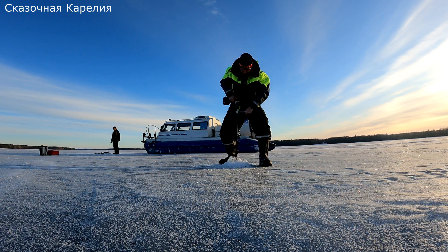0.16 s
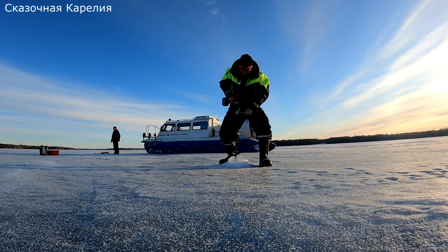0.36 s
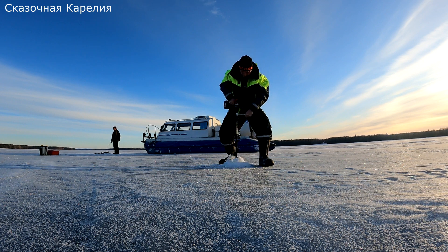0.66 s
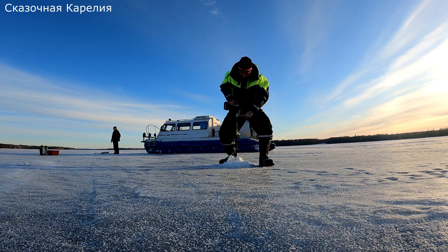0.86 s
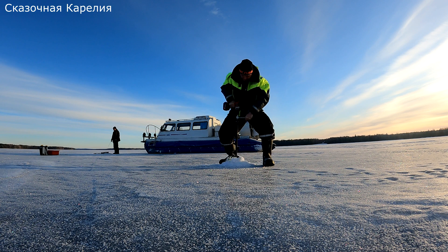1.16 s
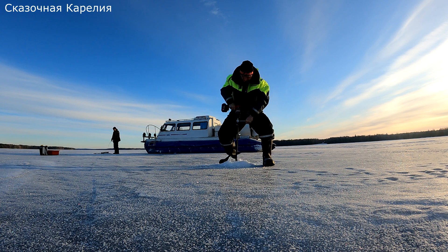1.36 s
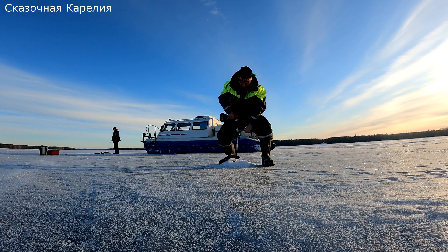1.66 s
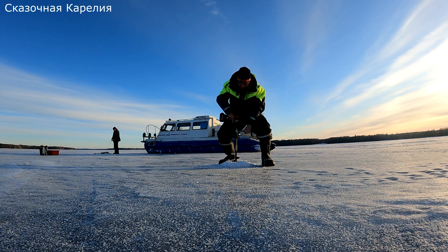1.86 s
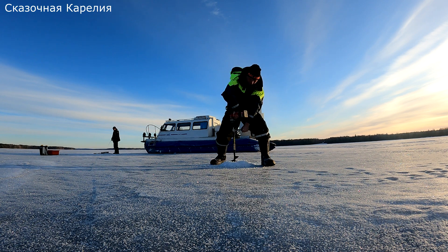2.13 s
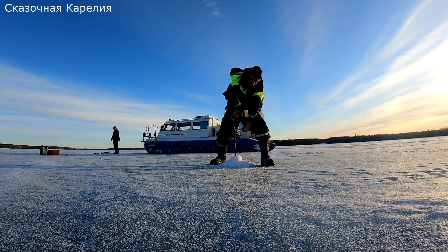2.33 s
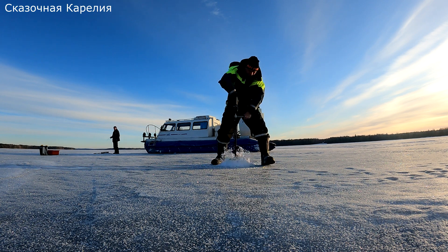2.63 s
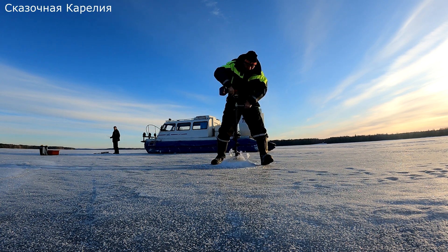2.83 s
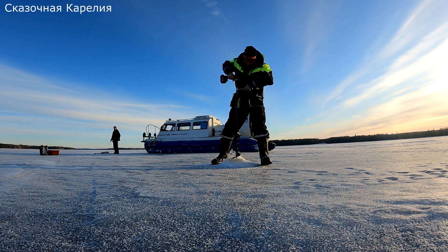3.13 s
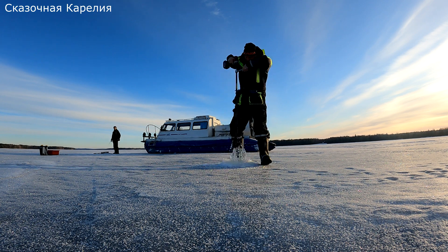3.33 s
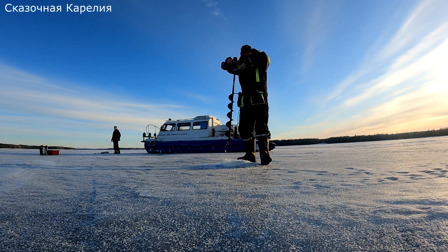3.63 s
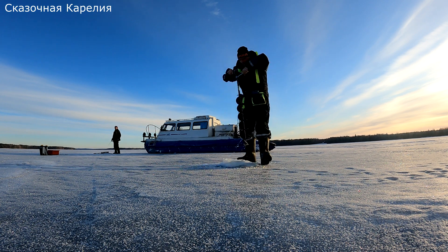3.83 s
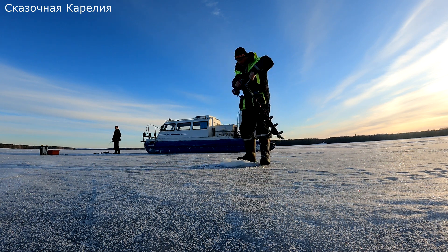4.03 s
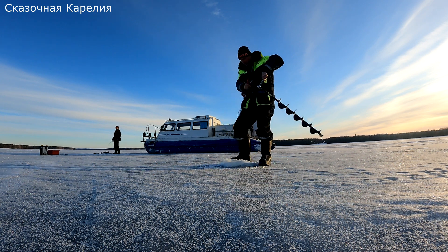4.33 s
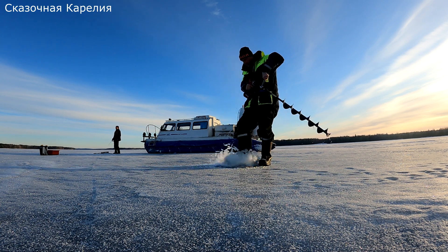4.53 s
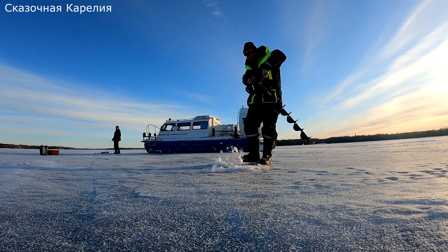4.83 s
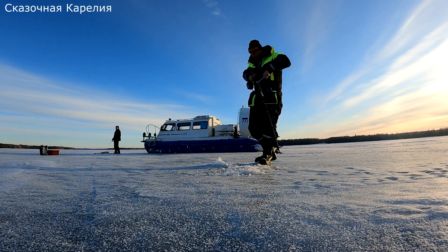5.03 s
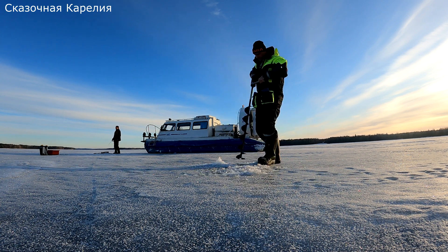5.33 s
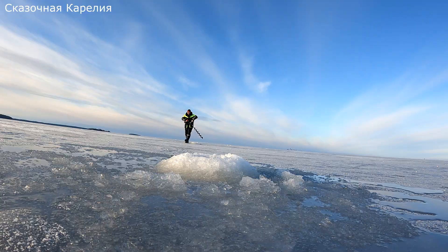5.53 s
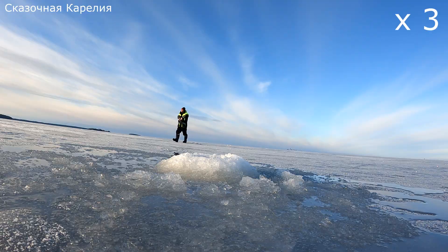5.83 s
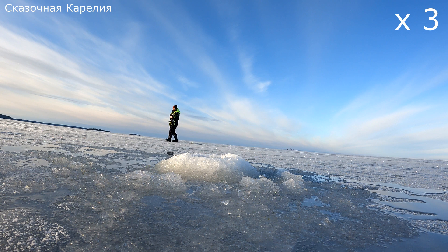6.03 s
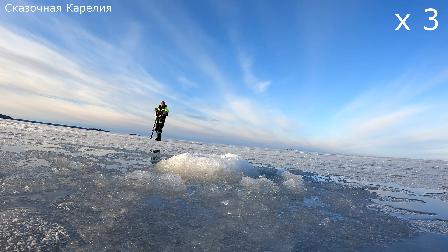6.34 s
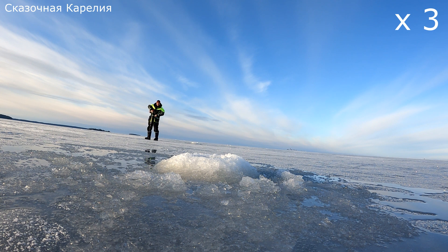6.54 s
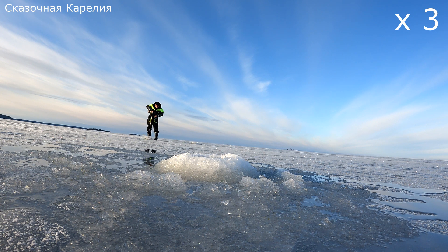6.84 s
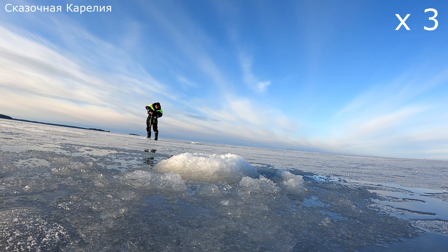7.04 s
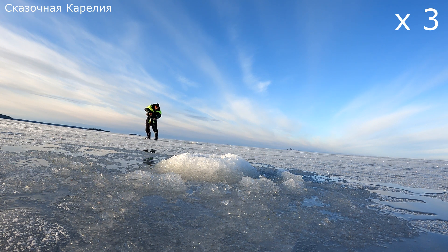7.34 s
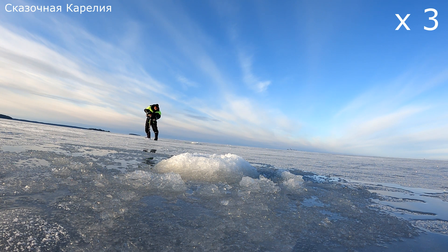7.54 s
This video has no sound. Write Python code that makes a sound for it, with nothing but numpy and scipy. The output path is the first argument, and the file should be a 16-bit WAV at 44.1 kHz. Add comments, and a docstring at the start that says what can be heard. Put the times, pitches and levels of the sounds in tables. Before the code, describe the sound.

A cordless drill bores an auger through lake ice, stops, churns up slush and splashing water, then boots crunch and a brighter, raspier hole begins.

```python
"""A cordless drill turns an auger in lake ice: gear tones whine and grains of noise make chips and slush.
The blades bind and break through, then the auger churns slush and rattles up out of the hole.
Washes of noise spill water and sweep slush aside, rising tones make splats, and a boat engine idles behind.
Then, from another spot without the engine, boots crunch in clumps of tiny impacts and
the drill starts a new hole, with a bright rasp on dry crust and a singing shaft."""
import sys
import numpy as np
from scipy import signal
from scipy.fft import rfft, irfft, next_fast_len
from scipy.io import wavfile
from scipy.ndimage import uniform_filter1d, map_coordinates

SR = 44100
rng = np.random.default_rng(int(sys.argv[2]) if len(sys.argv) > 2 else 0)


def generate_wav(signal):
    """Clip the signal to [-1, 1] and save it as 16-bit WAV at the path in sys.argv[1]."""
    frames = np.transpose(np.atleast_2d(signal))
    scaled = np.clip(frames, -1, 1) * 32767
    pcm = np.round(scaled).astype(np.int16)
    wavfile.write(sys.argv[1], SR, pcm)


N = 339129
TIME = np.arange(N) / SR   # seconds

# Levels in dB are relative settings; each source balances its own layers further on.
# Gear speed while boring, before the swing of each turn: (time [s], tooth-mesh rate [Hz])
BORING_SPEED = [(1.41, 988), (1.442, 715), (1.465, 930), (1.497, 1052), (1.535, 1025), (1.572, 980),
                (1.6, 1062), (1.68, 1070), (1.722, 932), (1.797, 1008), (1.825, 760)]
# Gear speed while clearing the hole: (time [s], tooth-mesh rate [Hz])
CLEARING_SPEED = [(2.22, 480), (2.26, 615), (2.32, 752), (2.375, 825), (2.41, 950), (2.445, 1025),
                  (2.485, 988), (2.52, 1085), (2.547, 925), (2.578, 1020), (2.62, 900)]
# Gear speed at the new hole: (time [s], tooth-mesh rate [Hz])
NEW_HOLE_SPEED = [(6.755, 375), (6.785, 760), (6.8, 1025), (6.815, 1142), (6.86, 1075), (7.2, 1027),
                  (7.69, 1011)]
# Gear tones while boring: (multiple of the mesh rate, level [dB])
BORING_TONES = [(1, -9), (2, -16), (3, -21), (4, -6), (5, -20), (6, -13.5)]
# Gear tones from the moment the blades catch: (multiple of the mesh rate, level [dB])
FREE_TONES = [(1, -4.5), (2, -9), (3, -6.5), (4, -6.5), (5, -11.5), (6, -6)]
# Gear tones under the strain of lifting: (multiple of the mesh rate, level [dB])
LIFTING_TONES = [(1, -6), (1.42, -4), (3, -5.5), (4, -5.5), (4.55, -9.5), (5, -10), (6, -12), (6.62, -8.5)]
# Gear tones at the new hole: (multiple of the mesh rate, level [dB])
NEW_HOLE_TONES = [(3, -3.5), (3.47, -17), (6, -8), (6.55, -12), (12, -9), (15, -8)]
# Strength of the gear whine while boring: (time [s], level [dB])
BORING_WHINE = [(0, -34), (.95, -29.5), (1.4, -34), (1.455, -24.5), (1.49, -31.5), (1.74, -29.5),
                (1.797, -25), (1.812, -40)]
# Load on the blades, which lets go as they break through: (time [s], level [dB])
BLADE_LOAD = [(0, 0), (1.37, -0.5), (1.47, -7), (1.56, -9.5), (1.665, -0.5), (1.755, -11), (1.81, -10)]
# Effort of the drill as it lifts the flooded auger: (time [s], level [dB])
LIFT_EFFORT = [(2.19, -29), (2.29, 0.5), (2.56, -1.5), (2.65, -12.5), (3.08, -10.5), (3.255, -6.5),
               (3.295, -23)]
# Buzzing bursts of the casing: two crunches while boring, then blades catching, motor braking
# and speed gathering: (time [s], length [s], level [dB])
CASING_STRAINS = [(1.228, .035, -30.5), (1.308, .03, -32), (1.422, .02, -29), (1.798, 0.018, -29),
                  (2.215, 0.38, -32.5)]
# The auger bangs and drags on the wall: (time [s], level [dB], length of contact [s])
WALL_KNOCKS = [(1.43, -12.5, 0.0085), (1.494, -16.5, 0.0046), (1.648, -18.5, 0.011), (2.403, -16.5, .008),
               (2.418, -13, 0.0086), (2.467, -14.5, 0.0077), (2.514, -9.5, 0.0094), (2.547, -12.5, 0.0075),
               (2.715, -14, 0.0052), (2.739, -15.5, 0.016), (2.82, -13.5, 0.0054), (2.85, -16.5, .014),
               (2.892, -15.5, 0.017), (2.918, -11.5, 0.01), (2.957, -13.5, 0.027), (2.991, -10.5, 0.0099),
               (3.014, -11.5, 0.0078), (3.044, -9.5, 0.022), (3.075, -8.5, 0.022), (3.124, -9, .007),
               (3.143, -13.5, .008), (3.165, -8.5, 0.02), (3.21, -7.5, 0.0086), (3.231, -11.5, .008),
               (3.253, -7.5, 0.0083)]
# Washes over the ice: (time [s], length [s], spill level [dB], spray level [dB], fall [dB/s])
WATER_WASHES = [(1.815, 0.06, -47, -50.5, 53), (3.24, 0.063, -35, -42, 22.5), (3.477, .27, -46, -39.5, 147),
                (3.978, .21, -53, -47, 58), (4.12, 0.1, -45.5, -43, 60), (4.24, 0.12, -35.5, -40, 63),
                (4.409, 0.088, -28, -32.5, 34), (4.755, .21, -36, -24.7, 57), (5.21, 0.075, -32, -44, 279)]
# Heavy lumps of slush: (time [s], level [dB])
SLUSH_THUMPS = [(1.41, -14), (1.577, -15), (1.705, -15.5), (2.376, -13), (2.438, -10), (2.533, -9.5),
                (4.581, -14)]
# Splats and drops: (time [s], level [dB], starting bubble pitch [Hz], extra slap level [dB])
WET_SPLATS = [(1.876, -29, 1890, -3.5), (2.065, -36, 3000, -5), (2.197, -31, 2870, -4),
              (2.22, -23, 2750, -15), (3.42, -24, 1164, -18), (3.782, -19.5, 2300, -19),
              (4.221, -25.5, 2560, -7), (4.304, -23.5, 2040, -5), (4.371, -19.5, 1330, 0),
              (4.412, -27, 1410, 1), (4.477, -14.5, 1930, -2.5), (4.585, -11, 1210, -3.5),
              (4.698, -26, 1340, 1), (5.283, -23, 1460, 0.5), (5.439, -25, 3250, -1.5)]
# Boots, and last the auger's tip, pressing the crust: (time [s], length [s], level [dB])
CRUST_STEPS = [(5.701, 0.14, -51.5), (5.891, 0.083, -43), (6.055, 0.086, -46), (6.272, 0.063, -46),
               (6.364, 0.015, -47.5), (6.404, .1, -46.5), (6.544, 0.028, -42.5), (6.633, 0.026, -48),
               (6.749, .03, -39)]
# Crust snapping underfoot: (time [s], level [dB])
CRUST_SNAPS = [(5.724, -32), (5.899, -25), (5.927, -23), (5.96, -23.5), (6.058, -29), (6.294, -21),
               (6.38, -30), (6.475, -21.5), (6.4925, -11.5), (6.498, -21), (6.613, -22.5), (6.647, -24.5)]
# Dull bumps on the ice: (time [s], level [dB], pitch [Hz])
ICE_BUMPS = [(5.926, -39, 440), (6.058, -35, 620), (6.186, -41, 485), (6.291, -42, 208.8),
             (6.486, -44, 424), (6.612, -41, 480)]
# Idling boat engine: (multiple of the firing rate, level [dB])
IDLE_TONES = [(1, -41), (2, -47), (3, -60)]
# Ringing of the gear housing: (pitch [Hz], width [Hz], lift [dB])
HOUSING_RING = [(2960, 1200, 7), (5860, 1060, 3.5), (6670, 57, 4), (9400, 330, 3.5)]
# Ringing of the auger: (pitch [Hz], width [Hz], lift [dB])
AUGER_RING = [(488, 69, 8), (990, 95, 9), (1303, 144, 9.5), (1830, 58, 11.2), (2147, 230, 9.8)]
# Ringing of the shaft when knocked: (pitch [Hz], width [Hz], lift [dB])
KNOCKED_SHAFT_RING = [(473.5, 71, 17), (1032, 60, 4.1), (2200, 210, 6.7)]
# Ringing of the blades on dry crust: (pitch [Hz], width [Hz], lift [dB])
RASPING_BLADE_RING = [(5380, 170, 3.8), (6220, 290, 8.5), (6700, 90, 5.2), (7050, 250, 3.1)]
# Ringing of the bare shaft at the new hole: (pitch [Hz], width [Hz], lift [dB])
BARE_SHAFT_RING = [(529.6, 130, 10), (1663, 41, 6.3)]
# Colour of the gear clatter: (frequency [Hz], level [dB per Hz])
GEARBOX_COLOUR = [(700, -8.5), (1500, -3.5), (2600, -3.5), (4000, -1), (5000, -2), (7000, -3.5), (8000, -3),
                  (9800, -6), (11000, -14.5), (14000, -26.5), (15500, -55)]
# Colour of the blades chipping ice: (frequency [Hz], level [dB per Hz])
CHIP_COLOUR = [(150, -40.5), (400, 7), (720, -20), (1150, 4), (2000, -1.5), (2600, -11), (4000, -29.5),
               (9000, -35)]
# Colour of churning slush: (frequency [Hz], level [dB per Hz])
CHURN_COLOUR = [(35, -31.5), (70, -7.5), (130, 1), (360, -1), (560, -3.5), (850, -14), (1500, -15.5),
                (5000, -66)]
# Colour of knocks on the wall: (frequency [Hz], level [dB per Hz])
KNOCK_COLOUR = [(100, -12), (350, -23.5), (600, -2.5), (1500, -2.5), (2400, -7.5), (3500, -12.5),
                (7000, -16.5), (10000, -24.5), (15000, -45)]
# Colour of spilling water: (frequency [Hz], level [dB per Hz])
SPILL_COLOUR = [(100, -10), (300, -1.5), (700, -5), (1400, -0.5), (2200, -3), (4000, -11), (12000, -40)]
# Colour of pattering spray: (frequency [Hz], level [dB per Hz])
SPRAY_COLOUR = [(600, -24), (1500, -1), (2800, 4), (5000, 2), (7500, 0), (8600, -7.5), (11000, -12.5),
                (14000, -25), (15500, -64)]
# Colour of crunching steps: (frequency [Hz], level [dB per Hz])
CRUNCH_COLOUR = [(88, -56), (150, -12), (190, -15.5), (361, -12), (612, -6.5), (1140, -7.5), (2020, -13.5),
                 (2700, -12.5), (3770, -4.5), (11700, -7), (16000, -3.5)]
# Colour of the rasp on dry crust: (frequency [Hz], level [dB per Hz])
RASP_COLOUR = [(1500, -36.5), (2700, -11), (3200, 1), (4500, -2), (5800, 1), (9500, -2.5), (11000, -4.5),
               (13000, -3.5), (15600, -6)]
# Colour of the humming bare shaft: (frequency [Hz], level [dB per Hz])
SHAFT_COLOUR = [(50, -28), (130, -14), (220, -7), (500, -1.5), (800, 2), (1300, 6.5), (2500, 4.5),
                (4000, -23)]
# Colour of the low grinding on solid ice: (frequency [Hz], level [dB per Hz])
GRIND_COLOUR = [(90, -30), (160, -2), (250, 3.5), (420, -13), (2000, -36)]
# Colour of the exhaust rumble: (frequency [Hz], level [dB per Hz])
RUMBLE_COLOUR = [(30, -19), (60, 6), (120, 4), (220, -4), (320, -12), (450, -12.5), (1000, -34),
                 (9000, -49)]
# Colour of the quiet air: (frequency [Hz], level [dB per Hz])
AIR_COLOUR = [(30, -32), (157, -8.5), (336, -13), (632, 4.5), (2540, -25.5), (3670, -12), (10800, -24),
              (16000, -14)]

MOVE_S = 5.548   # the listening spot changes
PORT_LAG, PORT_LAG_NEW = .68, .27   # how much later the left side hears, in samples
# boring: the trigger is released at the stop
BORE_STOP_S, STOP_DB_PER_S = 1.821, 1002
JAM_S = 1.425   # the blades catch at the underside of the ice
GEARBOX_DB, BLADES_DB, CHURN_DB = -24.5, -25, -27.5   # at the opening load
GEARBOX_FOLLOWS, BLADES_FOLLOW, CHURN_FOLLOWS = 0.68, 1.76, 0.87   # dB per dB of load
TURNS_PER_S, SWING, FASTEST_S, SWING_DB = 4.93, .021, .147, 3.5   # SWING is a fraction of the speed
# clearing: the flights catch, scrape the wall and pump up a surge of slush
LIFT_GEARBOX_DB, LIFT_WHINE_DB = -30, -29.5
ENGAGE_S, SCRAPE_S, SCRAPE_DB, SCRAPE_FOLLOWS = 2.36, 1, -29.5, 0.37
SURGE_S, SURGE_DB, SURGE_FOLLOWS = 0.23, -23, 0.43
CASING_HZ = 2980   # where the casing rings
# the new hole: the blades sink in, then the rasp eases off
NEW_START_S, SINK_S, RASP_HOLD_S, RASP_EASES_DB_PER_S = 6.742, 0.18, 0.37, 5
RASP_DB, SHAFT_DB, NEW_WHINE_DB = -22.5, -40, -32
SWEEP_S, SWEEP_DB = 6.765, -31   # the highest gear tones sweep up first
CHIRP_S, CHIRP_DB = 6.789, -32   # the gears sing out just before they reach full speed
SONG_S, SONG_DB, SHAFT_HZ = 7.26, -41, 2440   # the bare shaft starts to sing
DIG_S, DIG_DB = 7.0, -52.5   # the blades reach solid ice and add a low grinding
# water, boots and boat
WASH_ATTACK_S, TRICKLE_DB = 0.058, -59
STEP_ATTACK_S, STEP_FALL_DB_PER_S = .004, 700
SCUFF_DB, SCUFF_END_S = -58.5, 6.34   # soles drag lightly between the steps
IDLE_HZ = 98.4   # firing rate
CUTOFF_HZ = 15900


def deep_hole():
    """Gears whine and clatter in their housing, blades chip the ice in surges, the flights churn slush."""
    singing, gearbox, blades, churn = boring() + clearing()
    clatter = body(grains(9000, 3.24) * from_db(1.0 * drift(60)), GEARBOX_COLOUR, HOUSING_RING)
    # the blades bite about fourteen times a second
    turn = 2 * np.pi * np.cumsum(14.0 * (1 + 0.15 * drift(5.8))) / SR
    bite = from_db(2.0 * np.sin(turn) + 1.23 * drift(55))
    chip_grains = shifting(blades * bite * grains(3500, 0.91), depth=0.47)
    chips = wander(body(chip_grains, CHIP_COLOUR, AUGER_RING), stray_s=.0012)
    slush = from_db(-3) * body(churn * from_db(2.0 * drift(35)) * grains(1500, 1.5), CHURN_COLOUR)
    return casing(singing * gears()) + gearbox * shifting(clatter, depth=0.66) + chips + slush


def boring():
    """Gains of whine, gearbox, blades and slush: all but the whine follow the load on the blades."""
    load_db = np.interp(TIME, *np.transpose(BLADE_LOAD))
    running = from_db(-STOP_DB_PER_S * np.clip(TIME - BORE_STOP_S, 0, .5))
    whine_db = np.interp(TIME, *np.transpose(BORING_WHINE))
    gearbox_db = GEARBOX_DB + GEARBOX_FOLLOWS * load_db
    blades_db = BLADES_DB + BLADES_FOLLOW * load_db
    churn_db = CHURN_DB + CHURN_FOLLOWS * load_db
    return running * from_db([whine_db, gearbox_db, blades_db, churn_db])


def clearing():
    """The same four gains while lifting: all follow effort, blades and slush once the flights catch."""
    effort_db = np.interp(TIME, *np.transpose(LIFT_EFFORT), left=-150, right=-150)
    scrape = swell(ENGAGE_S, SCRAPE_S, attack_s=0.029, fall_db_per_s=398)
    surge = swell(ENGAGE_S, SURGE_S, attack_s=0.032, fall_db_per_s=23)
    whine = from_db(LIFT_WHINE_DB + 1.4 * effort_db)
    gearbox = from_db(LIFT_GEARBOX_DB + effort_db)
    blades = scrape * from_db(SCRAPE_DB + SCRAPE_FOLLOWS * effort_db)
    churn = surge * from_db(SURGE_DB + SURGE_FOLLOWS * effort_db)
    return np.array([whine, gearbox, blades, churn])


def gears():
    """Meshing teeth sing: clean and loudest at top speed while boring, rougher after the blades catch."""
    speed = turning(BORING_SPEED + CLEARING_SPEED)
    # an off-centre gear throws sidebands
    wobble = 1 + 0.15 * gear_tones(speed, [(1 / 3, 0)], flutter=0.0026, rough_db=-2.0)
    clean = from_db(SWING_DB * each_turn()) * gear_tones(speed, BORING_TONES, flutter=.003, rough_db=2)
    stutter = rms_one(from_db(2.5 * drift(110)))   # slack teeth touch unevenly
    free = from_db(-2.5) * stutter * gear_tones(speed, FREE_TONES, flutter=.004, rough_db=2)
    rough = from_db(-3.5) * stutter * gear_tones(speed, LIFTING_TONES, flutter=.008, rough_db=3.5)
    return wobble * np.select([TIME < JAM_S, TIME < LIFT_EFFORT[0][0]], [clean, free], rough)


def gear_tones(mesh_hz, orders, flutter, rough_db):
    """Tones at multiples of the tooth-mesh rate; the load makes speed and strength tremble."""
    phase = 2 * np.pi * np.cumsum(mesh_hz * (1 + flutter * drift(44.9))) / SR
    return sum(from_db(db) * rms_one(np.sin(k * phase) * from_db(rough_db * drift(21)))
               for k, db in orders)


def turning(speed):
    """Tooth-mesh rate, swinging a little with each turn in the deep ice."""
    return np.interp(TIME, *np.transpose(speed)) * (1 + SWING * each_turn())


def each_turn():
    """Deep in solid ice the auger runs freer (+1) and heavier (-1) once on every turn."""
    return (TIME < JAM_S) * np.cos(2 * np.pi * TURNS_PER_S * (TIME - FASTEST_S))


def casing(whine):
    """The small casing gives little bass; tones near its pitch flare up, and in short bursts it buzzes."""
    strain = np.max([from_db(db) * swell(s, length_s, attack_s=length_s / 6, fall_db_per_s=500)
                     for s, length_s, db in CASING_STRAINS], axis=0)
    whine = signal.sosfilt(signal.butter(2, 750, "high", fs=SR, output="sos"), whine)
    flare = .7 * signal.lfilter(*signal.iirpeak(CASING_HZ, 16, fs=SR), whine)
    # loose parts slap in step with the teeth
    slapping = np.sign(whine) + 2.1 * rng.standard_normal(N)
    buzz = signal.sosfilt(signal.butter(2, [2350, 4100], "band", fs=SR, output="sos"), slapping)
    return whine + flare + strain * rms_one(buzz)


def knocks():
    """The auger rubs and bangs on the wall of the hole and its shaft rings."""
    rubbing = from_db(.5) * clearing()[2]   # the blade gain
    banging = np.max([from_db(db) * swell(s, length_s, attack_s=0.0013, fall_db_per_s=950)
                      for s, db, length_s in WALL_KNOCKS], axis=0)
    scrape = shifting(np.hypot(rubbing, banging) * grains(2800, 2.3), depth=.6)
    ringing = wander(body(scrape, KNOCK_COLOUR, KNOCKED_SHAFT_RING), stray_s=.001)
    return from_db(-9.5) * ringing


def new_hole():
    """The drill whines up to speed, blades shave dry crust with a bright rasp, the bare shaft rings."""
    crust = from_db(RASP_DB) * swell(NEW_START_S, RASP_HOLD_S, SINK_S, RASP_EASES_DB_PER_S)
    rasp_grains = shifting(crust * from_db(0.69 * drift(77)) * grains(9000, 1.4), depth=0.78)
    rasp = body(rasp_grains, RASP_COLOUR, RASPING_BLADE_RING)

    shaft = from_db(SHAFT_DB) * np.clip((TIME - NEW_START_S) / 0.34, 0, 1) ** 0.69
    ringing = body(shaft * from_db(1.96 * drift(20)) * grains(3000, 1.4), SHAFT_COLOUR, BARE_SHAFT_RING)
    song = from_db(SONG_DB) * np.clip((TIME - SONG_S) / .15, 0, 1) ** .5
    ringing += song * gear_tones(SHAFT_HZ, [(1, 0)], flutter=.017, rough_db=4)

    speed = turning(NEW_HOLE_SPEED)
    whine = from_db(NEW_WHINE_DB) * swell(CHIRP_S, RASP_HOLD_S, attack_s=0.074, fall_db_per_s=6.5)
    whine += from_db(CHIRP_DB) * swell(CHIRP_S, length_s=0.016, attack_s=0.01, fall_db_per_s=1200)
    tremble = rms_one(from_db(1.5 * drift(150)))
    tones = whine * gear_tones(speed, NEW_HOLE_TONES, flutter=.006, rough_db=2.4) * tremble
    sweep = from_db(SWEEP_DB) * swell(SWEEP_S, .012, attack_s=.003, fall_db_per_s=800)
    tones += sweep * gear_tones(speed, NEW_HOLE_TONES[-2:], flutter=.006, rough_db=2)

    digging = from_db(DIG_DB) * np.clip((TIME - DIG_S) / 0.21, 0, 1)
    grind = body(digging * grains(1500, 2.1), GRIND_COLOUR)
    return rasp + ringing + grind + tones


def water():
    """Slush spills over the ice, droplets patter down and heavy lumps thump, all made of tiny impacts."""
    spill, spray = washes()
    spilling = body(spill * from_db(1.1 * drift(42)) * grains(1100, 2.65), SPILL_COLOUR)
    spraying = body(spray * from_db(1.3 * drift(46)) * grains(5000, 2.7), SPRAY_COLOUR)
    lumps = from_db(-8.5) * body(bursts(SLUSH_THUMPS, 0.00099, 0.0094) * grains(5000, 6.0), CHURN_COLOUR)
    spilling = from_db(-2.5) * shifting(spilling, depth=0.93)
    spraying = from_db(-1.5) * shifting(spraying, depth=0.38)
    return spilling + spraying + lumps


def washes():
    """Gains of spill and spray: each wash swells and drains away, over a trickle after the boring stops."""
    spill = spray = from_db(TRICKLE_DB) * (TIME > BORE_STOP_S)
    for s, length_s, spill_db, spray_db, fall in WATER_WASHES:
        flow = swell(s, length_s, WASH_ATTACK_S, fall)
        spill = np.hypot(spill, from_db(spill_db) * flow)
        spray = np.hypot(spray, from_db(spray_db) * flow)
    return spill, spray


def splats():
    """Each wet lump lands with a sharp slap and traps a bubble whose pitch rises."""
    out, age = np.zeros(N), TIME[:SR // 20]
    for s, db, hz, _ in WET_SPLATS:
        at = int(s * SR)
        bubble = np.sin(2 * np.pi * hz * age * (1 + 22 * age)) * np.exp(-age / .0028)
        out[at:at + len(age)] += from_db(db - 3.5) * bubble
    slap_rows = [(s, db + slap_db) for s, db, _, slap_db in WET_SPLATS]
    slap = bursts(slap_rows, .0001, .001) * rng.standard_normal(N)
    return out + from_db(-2.0) * body(slap, SPRAY_COLOUR) + from_db(-0.5) * body(slap, SPILL_COLOUR)


def steps():
    """Boots scuff and crush the frozen crust in clumps of sharp grains, with a few louder snaps."""
    scuff = [(CRUST_STEPS[0][0], SCUFF_END_S - CRUST_STEPS[0][0], SCUFF_DB)]
    tread = np.max([from_db(db) * swell(s, length_s, STEP_ATTACK_S, STEP_FALL_DB_PER_S)
                    for s, length_s, db in CRUST_STEPS + scuff], axis=0)
    crush = tread * rms_one(from_db(2.3 * drift(90))) * grains(5000, 4.8)
    snaps = from_db(-9) * bursts(CRUST_SNAPS, .0002, .0023) * grains(20000, 1.5)
    return body(shifting(crush + snaps, depth=0.42), CRUNCH_COLOUR) + bumps()


def bumps():
    """Short, heavily damped thuds on the ice."""
    out, age = np.zeros(N), TIME[:SR // 10]
    for s, db, hz in ICE_BUMPS:
        at, cycles = int(s * SR), hz * age
        thud = np.sin(2 * np.pi * cycles) * (1 - np.exp(-2 * cycles)) * np.exp(-cycles / 1.7)
        out[at:at + len(age)] += from_db(db) * thud
    return out


def boat():
    """A distant idle: tones at multiples of the firing rate over an exhaust rumble."""
    phase = 2 * np.pi * np.cumsum(IDLE_HZ * (1 + 0.0077 * drift(5.3))) / SR
    firing = sum(from_db(db) * rms_one(np.sin(k * phase) * from_db(0.81 * drift(30)))
                 for k, db in IDLE_TONES)
    return firing + from_db(-44) * body(rng.standard_normal(N), RUMBLE_COLOUR)


def breeze():
    """Light air flutters on each microphone port, in the deep bass."""
    lumps = signal.sosfilt(signal.butter(1, [20, 70], "band", fs=SR, output="sos"),
                           rng.standard_normal((2, N)))
    flutter = rms_one(signal.sosfilt(signal.butter(1, 300, fs=SR, output="sos"), lumps))
    return from_db(-59 + 2 * drift(2)) * flutter


def quiet_air():
    """A faint steady hush of coloured noise."""
    return from_db(-61.5) * body(rng.standard_normal(N), AIR_COLOUR)


def from_db(db):
    """Decibels to gain."""
    return 10 ** (np.asarray(db) / 20)


def rms_one(x):
    """Scale to unit power."""
    return x / np.sqrt(np.mean(x ** 2) + 1e-20)


def drift(rate):
    """Smooth random wandering of spread 1; a higher rate wanders faster."""
    r = np.exp(-40 * np.pi * rate / SR)   # computed at every 20th sample
    noise = rng.standard_normal(N // 20 + 2002)
    slow = signal.lfilter([1], [1, -2 * r, r * r], noise)[2000:]
    return np.interp(np.arange(N) / 20, np.arange(len(slow)), rms_one(slow))


def grains(per_s, spread_db):
    """Random tiny impacts of uneven size, unit power."""
    sizes = from_db(spread_db * np.minimum(rng.exponential(1, N), 4.5))
    return rms_one(sizes * rng.choice([-1, 1], N) * (rng.random(N) < per_s / SR))


def bursts(rows, rise_s, fall_s):
    """Envelope of a row of blows, each swelling fast and dying away."""
    out, age = np.zeros(N), TIME[:SR // 3]
    shape = (1 - np.exp(-age / rise_s)) * np.exp(-age / fall_s)
    for s, db, *rest in rows:
        at = int(s * SR)
        out[at:at + len(age)] += from_db(db) * shape[:N - at] / shape.max()
    return out


def swell(start_s, length_s, attack_s, fall_db_per_s):
    """Envelope: a straight rise, a hold until the length is over, then an even fall in dB."""
    age = TIME - start_s
    return np.clip(age / attack_s, 0, 1) * from_db(-np.clip(fall_db_per_s * (age - length_s), 0, 200))


def body(x, spectrum, modes=()):
    """Filter of unit power gain that never acts ahead of time: a broad colour lifted by ringing modes."""
    size = 2 * next_fast_len(N // 2 + SR // 4)
    hz = np.arange(size // 2 + 1) * SR / size + 1
    points = np.array(spectrum)
    db = np.interp(np.log(hz), np.log(points[:, 0]), points[:, 1])
    for centre, width, lift in modes:
        db = db + lift / (1 + ((hz - centre) / width * 2) ** 2)
    # folding the cepstrum gives the filter its minimum delay
    cepstrum = irfft(np.log(rms_one(from_db(db))))
    cepstrum[1:size // 2] *= 2
    cepstrum[size // 2 + 1:] = 0
    return irfft(rfft(x, size) * np.exp(rfft(cepstrum)))[:N]


def shifting(x, depth):
    """Short, ever-changing paths through the ice give every chunk its own colour."""
    delays = (rng.uniform(.0003, .004, 6) * SR).astype(int)
    paths = sum(drift(15.0) * np.roll(x, d) for d in delays) / np.sqrt(len(delays))
    return (x + depth * paths) / np.sqrt(1 + depth ** 2)


def wander(x, stray_s):
    """Resonances glide up and down as the contact moves along the auger."""
    lag = uniform_filter1d(drift(4), SR // 25) * stray_s * SR
    return map_coordinates(x, [np.arange(N) + lag], order=3, mode="nearest")


def place(x, pan_db, lag, scatter_db, scatter_hz):
    """Two close ports: the left hears later; above the bass come shadow and scatter from rough ice."""
    size = next_fast_len(N + SR // 8)
    hz, age = np.arange(size // 2 + 1) * SR / size, TIME[:SR // 8]
    tail = rng.standard_normal(len(age)) * np.exp(-age / .02) * (age > .002)
    echoes = rms_one(tail) / np.sqrt(len(age))
    treble = hz ** 2 / (hz ** 2 + 350 ** 2)
    scatter = from_db(scatter_db) * hz ** 2 / (hz ** 2 + scatter_hz ** 2) * rfft(echoes, size)
    left = from_db(pan_db * treble / 2) * np.exp(-2j * np.pi * lag * hz / SR) + scatter
    right = from_db(-pan_db * treble / 2) - scatter
    return irfft(rfft(x, size) * np.array([left, right]), size)[:, :N]


def scene():
    """Two spots on the lake, one after the other."""
    first = place(deep_hole() + knocks(), pan_db=-3.0, lag=PORT_LAG, scatter_db=-12.0, scatter_hz=300)
    surroundings = water() + splats() + boat()
    first += place(surroundings, pan_db=-3.0, lag=PORT_LAG, scatter_db=-11.5, scatter_hz=300)
    first += breeze()
    second_spot = new_hole() + steps() + quiet_air()
    second = place(second_spot, pan_db=0.7, lag=PORT_LAG_NEW, scatter_db=-10.5, scatter_hz=4000)
    return np.where(TIME < MOVE_S, first, second)


def record(dry):
    """The highest peaks are rounded and the top is cut steeply."""
    rounded = .6 * np.tanh(dry / .6)
    return signal.sosfilt(signal.ellip(10, .2, 70, CUTOFF_HZ, fs=SR, output="sos"), rounded)


dry = scene()
out = record(dry)
generate_wav(out)
```